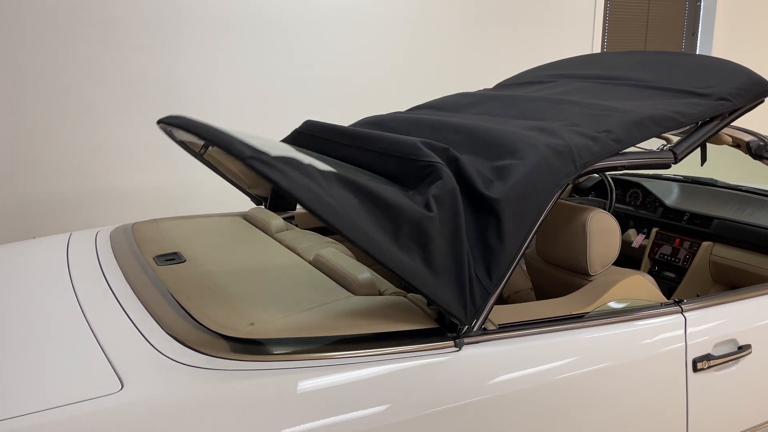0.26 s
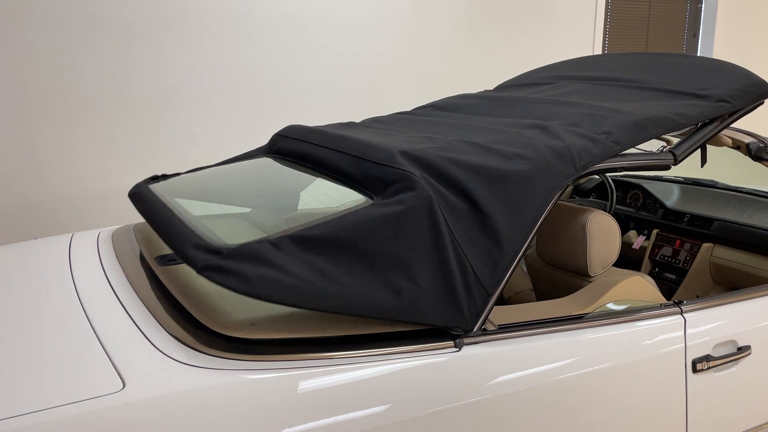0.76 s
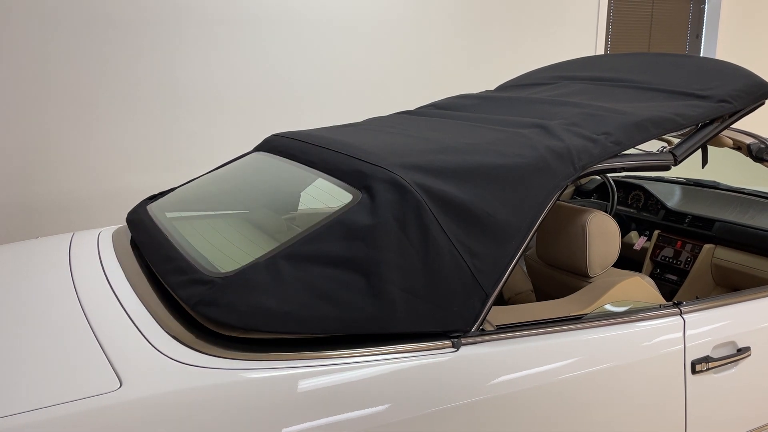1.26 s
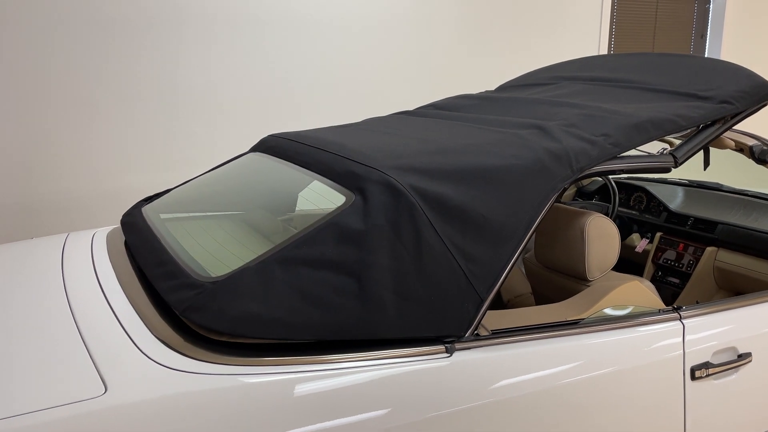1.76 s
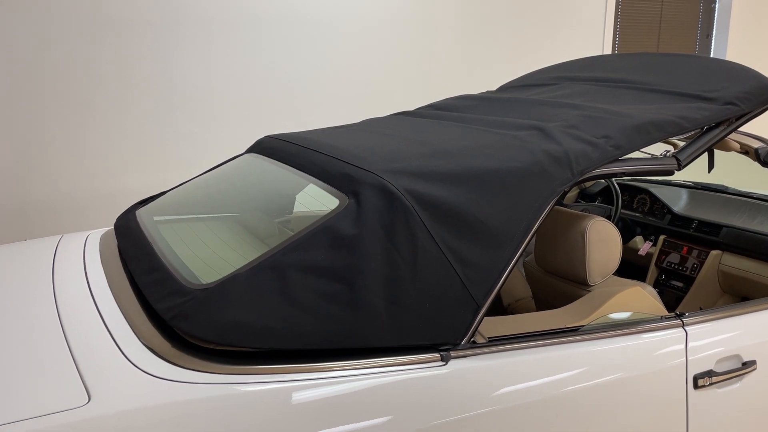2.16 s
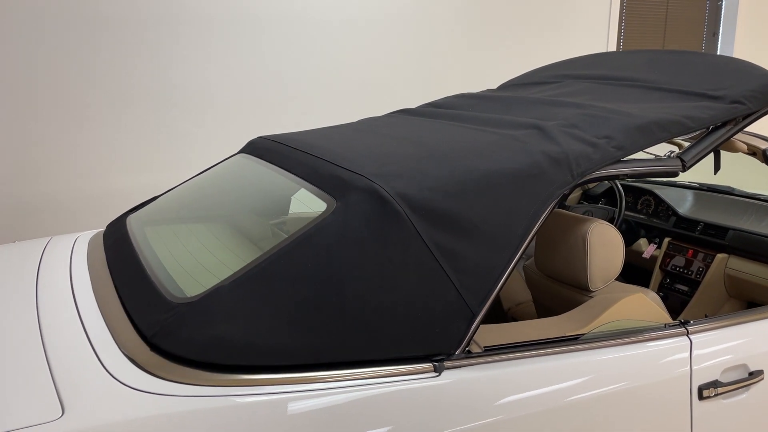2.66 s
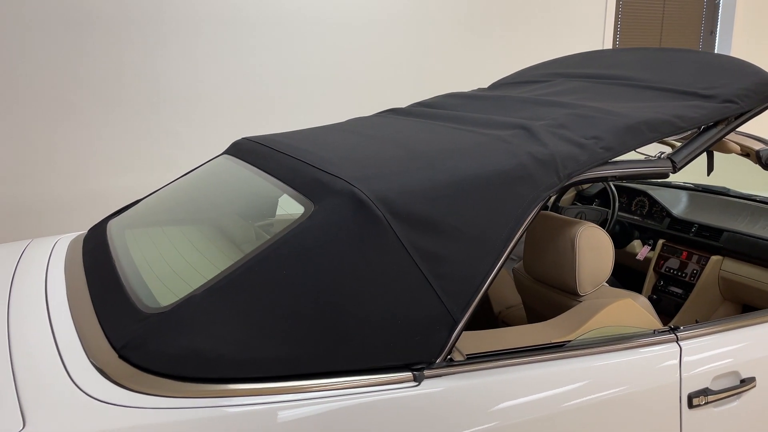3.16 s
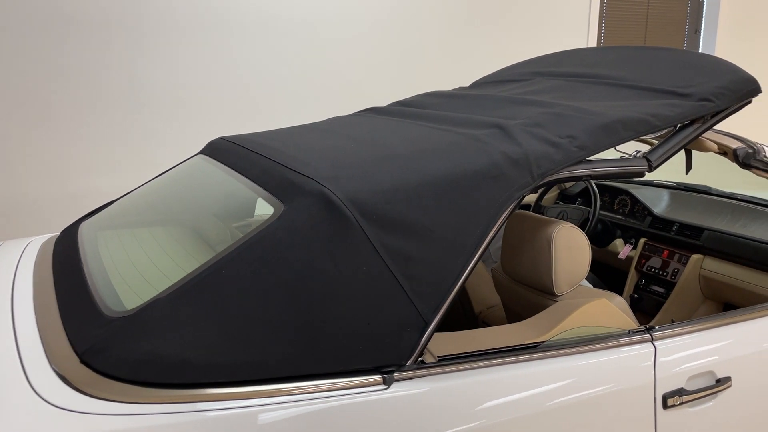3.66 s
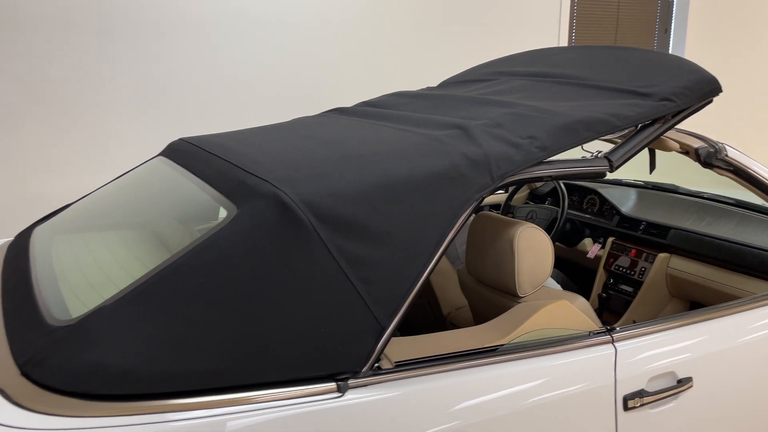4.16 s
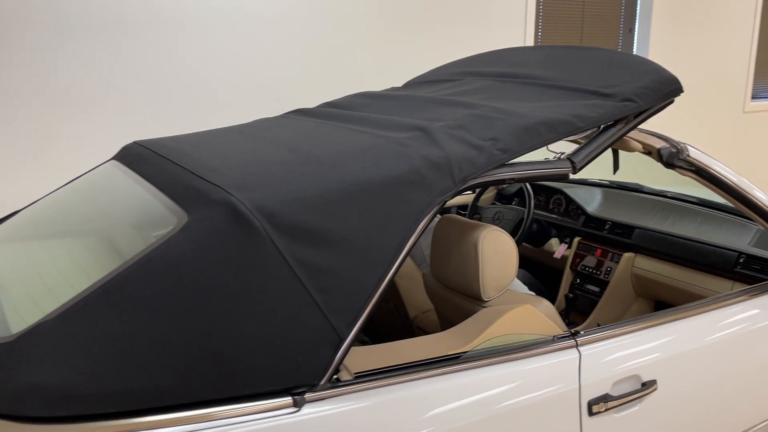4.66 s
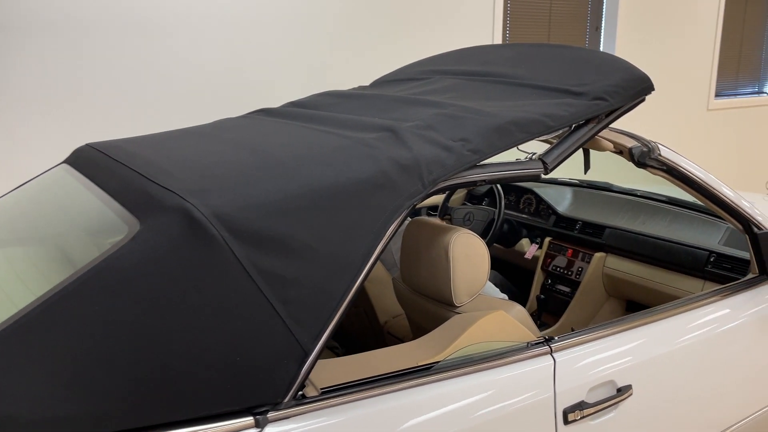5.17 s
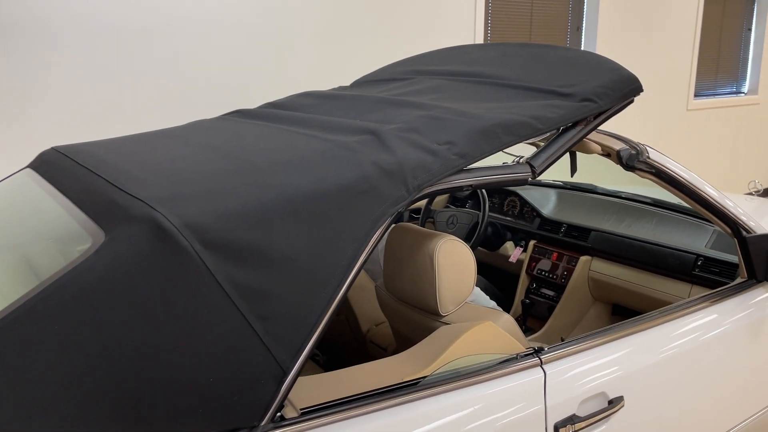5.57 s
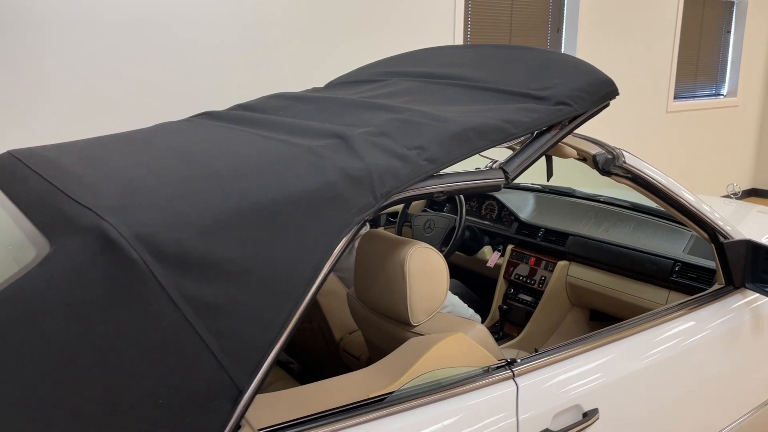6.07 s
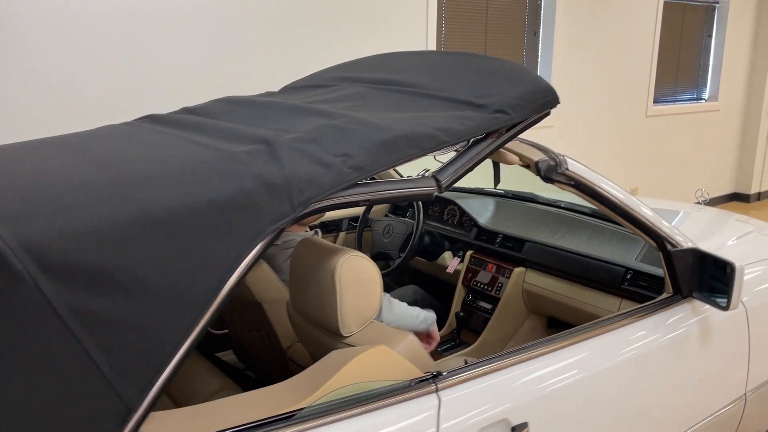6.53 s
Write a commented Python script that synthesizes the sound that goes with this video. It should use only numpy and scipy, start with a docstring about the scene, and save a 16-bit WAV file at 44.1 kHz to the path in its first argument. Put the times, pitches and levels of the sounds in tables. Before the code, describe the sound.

Steady low engine drone, airy fan rush and mid-pitched pump whine, broken by a loud metallic roof clunk and a few smaller knocks.

```python
"""A six-cylinder idle drones in a large showroom, surging once; an electric pump whines over it.
The hydraulic roof of the convertible then latches with a hard clunk and smaller knocks.
Engine, pump, hum and bay drone are wavering sines; knocks are decaying modes plus noise cracks,
with a hall tail. Fan and intake rush is shaped noise with valve ticking, cavity tones and hisses.
"""
import sys
import numpy as np
from scipy import signal
from scipy.fft import rfft, irfft, next_fast_len
from scipy.io import wavfile
from scipy.ndimage import uniform_filter1d

SR = 44100
rng = np.random.default_rng(int(sys.argv[2]) if len(sys.argv) > 2 else 0)


def output_pcm(signal):
    """Save a mono or channel-first signal as 16-bit PCM at the path in sys.argv[1].

    Samples are clipped to [-1, 1] before scaling.
    """
    pcm = np.clip(np.atleast_2d(signal).T, -1, 1) * 32767
    wavfile.write(sys.argv[1], SR, np.round(pcm).astype(np.int16))


N = 299866


def undb(db):
    """Decibels to gain."""
    return np.exp(np.asarray(db) * (np.log(10) / 20))


def curves(table):
    """Columns of a time table, interpolated at every sample."""
    s, *columns = np.transpose(table)
    return [np.interp(np.arange(N) / SR, s, column) for column in columns]


def over_hz(table, size):
    """A (Hz, dB) table, interpolated over log frequency at every transform bin."""
    hz, db = np.transpose(table)
    bin_hz = np.fft.rfftfreq(size, 1 / SR)
    return np.interp(np.log(bin_hz + 1), np.log(hz), db)


def walk(rate_hz):
    """Random levels held 1 / rate_hz s and slewed twice; spread near 1."""
    held = np.repeat(rng.standard_normal(int(N / SR * rate_hz) + 3), 8)
    slewed = uniform_filter1d(uniform_filter1d(held, size=8), size=8)
    return 1.3 * np.interp(np.arange(N) * rate_hz * 8 / SR, np.arange(len(held)), slewed)


def bump(s, half_s):
    """A smooth swell of height 1 around a moment, down to 1/e at half_s."""
    return np.exp(-((np.arange(N) / SR - s) / half_s) ** 2)


def tone(hz, db):
    """A sine with moving pitch and rms level, from a random phase."""
    cycles = np.cumsum(hz) / SR + rng.random()
    return np.sqrt(2) * undb(db) * np.sin(2 * np.pi * cycles)


def narrow(hz, width_hz):
    """Noise of rms 1 ringing in one resonance."""
    x = signal.lfilter(*signal.iirpeak(hz, hz / width_hz, fs=SR), rng.standard_normal(N))
    return x / x.std()


# Engine idle, surging once as the load drops.
# Each row: time in seconds, firing rate in Hz, firing tone in dB, its fourth multiple in dB.
IDLE = [(0, 39.33, -29.5, -45), (0.35, 38.84, -28, -39), (0.7, 39.3, -28.5, -51), (0.95, 42, -30, -49.5),
        (1.2, 41.43, -36, -50.5), (1.4, 40.6, -31, -49), (2.1, 38.11, -33.5, -45), (3.8, 37.99, -33.5, -60),
        (5.0, 38.55, -33.5, -48), (6.4, 38.09, -36, -60), (6.8, 39.13, -31, -64)]
# Weaker engine and belt-driven tones. Each row: multiple of the firing rate, level in dB.
ENGINE_TONES = [(1.33, -77), (2, -55.5), (2.22, -50.5), (2.82, -50.5), (3, -61), (3.43, -58.5), (3.75, -49),
                (4.47, -55.5), (5, -65), (6, -54.5), (6.35, -52.5), (8.75, -57), (9, -54), (10.5, -68),
                (12, -52)]
# Alternator slot tones. Each row: multiple of the firing rate, level in dB re the whine.
SLOTS = [(34.4, 0), (35.3, 3), (36.2, -3), (37.3, -4)]
WHINE_IDLE_DB = -59.5
SURGE_S, SURGE_RISE_DB, SURGE_HALF_S = 0.97, 7, 0.2


def engine():
    """Sines locked to the firing rate, wavering as combustion varies; the alternator sings above."""
    firing_hz, first_db, fourth_db = curves(IDLE)
    out = tone(firing_hz, first_db + 1.6 * walk(7.6))
    out += tone(4 * firing_hz, fourth_db + 1.3 * walk(4.16))
    for multiple, db in ENGINE_TONES:
        hz = multiple * firing_hz * (1 + 0.00291 * walk(5))
        out += tone(hz, db + 1.7 * walk(4.01))
    whine_db = WHINE_IDLE_DB + SURGE_RISE_DB * bump(SURGE_S, SURGE_HALF_S)
    for multiple, db in SLOTS:
        hz = multiple * firing_hz * (1 + 0.00401 * walk(20))
        out += tone(hz, whine_db + db + 2.0 * walk(15))
    return out


def ring(modes, centre_hz, spread_octaves, push_s, rattle_s, scatter_cycles):
    """Decaying modes, strongest near centre_hz, set off by a contact of push_s; peak near 1."""
    hz, db, t60_s = np.transpose(modes)[:, :, None]
    t = np.arange(SR // 3) / SR
    db = db - 6 * (np.log2(hz / centre_hz) / spread_octaves) ** 2
    # clamped differently at each blow
    hz = hz * (1 + 0.0059 * rng.standard_normal(hz.shape))
    # loose parts shake each mode, in steps of 30 samples
    rattle = rng.standard_normal((len(hz), len(t) // 30))
    rattle = uniform_filter1d(rattle, int(rattle_s * SR / 30), axis=1)
    db = db + 1.8 * np.repeat(rattle / rattle.std(), 30, axis=1) - 60 * t / t60_s
    cycles = hz * t + scatter_cycles * rng.random(hz.shape)
    y = np.sum(undb(db) * np.sin(2 * np.pi * cycles), axis=0)
    y *= 1 - np.exp(-t / push_s)
    return y / y[:SR // 40].std() / 3


# Noise colour of a crack. Each row: frequency in Hz, relative level in dB.
CRACK = [(300, -14), (700, -14), (1500, 0.5), (2500, -2), (3300, 0), (4000, -2.5), (5000, -3.5),
         (7000, -9.5), (10000, -8), (13000, -15), (15500, -23)]
# Crack decay: t60 in seconds of the body, then of the top.
CRACK_T60_S = 0.13, 0.086


def crack_noise():
    """Burst of coloured noise; the top dies sooner than the body."""
    t = np.arange(SR // 3) / SR
    top = np.clip(np.fft.rfftfreq(len(t), 1 / SR) / 9000, 0, 1)
    noise = rfft(rng.standard_normal(len(t))) * undb(over_hz(CRACK, len(t)))
    crack = np.zeros(len(t))
    for part, t60_s in zip((1 - top, top), CRACK_T60_S):
        crack += irfft(noise * part, len(t)) * np.exp(-np.log(1000) * t / t60_s)
    onset = 1 - np.exp(-t / 0.00055)
    return crack * onset / crack[:SR // 50].std() / 4


HALL_T60_S, HALL_DB, HALL_LOWPASS_HZ = 1.3, -22, 2620


def hall_tail(knocks):
    """Hall answer: convolution with dulled, decaying noise of unit energy."""
    t = np.arange(SR) / SR
    hall = rng.standard_normal(SR) * np.exp(-np.log(1000) * t / HALL_T60_S)
    hall *= 1 - np.exp(-t / 0.013)
    hall = signal.lfilter(*signal.butter(1, HALL_LOWPASS_HZ, fs=SR), hall)
    hall /= np.sqrt(np.sum(hall ** 2))
    return undb(HALL_DB) * signal.fftconvolve(knocks, hall)[:len(knocks)]


# Knocks of the roof frame. Each row: start in seconds, thump in dB, thump centre in Hz,
# ring in dB, ring centre in Hz, ring spread in octaves, crack in dB.
KNOCKS = [(1.314, -21.5, 84, -32, 700, .4, -49), (2.485, -27, 145, -42, 1502, .4, -35),
          (2.685, -27, 199, -11, 1950, 0.16, -11.5), (2.6858, -40, 199, -14, 1350, 0.22, -30),
          (2.687, -12.5, 201, -12, 644, 0.42, -15.5), (2.694, -40, 230, -22.5, 2410, 0.13, -21),
          (2.692, -19.5, 230, -10, 875, 0.21, -24), (2.699, -22.5, 250, -17, 1790, .1, -24),
          (2.704, -31, 250, -10, 840, 0.16, -38), (2.7104, -11, 190, -18, 1150, 0.44, -38),
          (2.719, -27, 200, -16, 760, .35, -40), (2.727, -27, 200, -24.5, 560, 0.45, -42),
          (2.734, -13.5, 120, -27, 1100, .4, -44), (2.741, -40, 120, -24, 990, .12, -42),
          (2.757, -35, 130, -35, 700, .4, -40), (2.775, -32, 150, -37, 1850, .3, -40),
          (2.79, -21.5, 155, -30, 875, .3, -41), (2.808, -28, 202.3, -28, 790, 0.28, -36),
          (2.835, -36, 170, -33, 1100, .5, -41), (2.869, -26, 169.6, -36, 1686, .4, -44),
          (2.9804, -28, 170, -30, 2015, .04, -21), (2.9853, -40, 173, -23, 960, 0.081, -36),
          (2.995, -34, 200, -33, 1400, .4, -33), (3.008, -36, 200, -33, 800, .5, -39),
          (4.016, -28.5, 249.8, -30, 453, 0.36, -40), (4.059, -26, 152, -29, 400, 0.45, -46)]
# Modes of the lid. Each row: nominal frequency in Hz, relative level in dB, t60 in seconds.
LID = [(91.6, -1, 0.24), (120, 8.5, 0.17), (168.6, 5.5, 0.1), (186, 2, 0.12), (218, 4.5, 0.1),
       (252, -2, 0.074), (280, -4, 0.62)]
# Modes of the frame. Each row: nominal frequency in Hz, relative level in dB, t60 in seconds.
FRAME = [(360, 0, 0.09), (461, 2.5, 0.1), (520, -5, 0.08), (582.8, 0.5, 0.099), (645, 2, 0.08),
         (705, 1, 0.09), (772, 2, 0.068), (826, -1, 0.09), (894, 3, 0.06), (940, 0.5, 0.063),
         (1032, -1.5, 0.14), (1120, 0, 0.073), (1208, -4, 0.076), (1344, -5, 0.081), (1441, -5, 0.07),
         (1540, -1, 0.07), (1684, 0.5, 0.072), (1766, -3, 0.06), (1805, 0, 0.053), (1884, -2, 0.057),
         (1940, -5.5, 0.04), (2006, -3, 0.05), (2210, -1, 0.053), (2420, -10, 0.08), (2480, -9, 0.06)]


def roof():
    """Each knock thumps the lid, rings the frame and cracks; the hall answers softly."""
    out = np.zeros(N + SR)
    for s, thump_db, thump_hz, ring_db, ring_hz, spread, crack_db in KNOCKS:
        knock = undb(crack_db) * crack_noise()
        knock += undb(thump_db) * ring(LID, thump_hz, spread_octaves=0.45, push_s=0.0015,
                                       rattle_s=0.021, scatter_cycles=0.18)
        knock += undb(ring_db) * ring(FRAME, ring_hz, spread_octaves=spread, push_s=0.00065,
                                      rattle_s=0.012, scatter_cycles=0.52)
        k = int(s * SR)
        out[k:k + len(knock)] += knock
    return (out + hall_tail(out))[:N]


# Electric pump whine, fading after the latch and returning lower.
# Each row: time in seconds, pitch in Hz, level in dB.
PUMP = [(0, 774.5, -42.5), (1.2, 775, -44), (1.6, 773, -41.5), (2.7, 777, -42), (3.2, 772.7, -48),
        (3.6, 776.4, -77), (4.5, 770, -51), (5.5, 769, -48), (6.45, 768, -46.5), (6.6, 761, -55),
        (6.8, 761.7, -58)]


def pump():
    """Pump whine: one sine with unsteady pitch and level."""
    hz, db = curves(PUMP)
    return tone(hz * (1 + 0.00307 * walk(24.86)), db + 2.0 * walk(20))


# Brief dips of the hum. Each row: time in seconds, level change in dB.
HUM_DIPS = [(.45, -1), (1.65, -9), (2.0, -3.5), (2.87, -2), (3.6, -5), (4.22, -11), (5.25, -7), (5.5, -4.5),
            (6.36, -13), (6.8, -6)]
HUM_HZ, HUM_DB, HUM_DIP_HALF_S = 58.1, -37.5, 0.11


def hum():
    """Low wavering sine, independent of the engine, that dips briefly."""
    db = HUM_DB + sum(dip_db * bump(s, HUM_DIP_HALF_S) for s, dip_db in HUM_DIPS)
    return tone(HUM_HZ * (1 + 0.00804 * walk(4.14)), db + 1.05 * walk(4.38))


# Drone from the engine bay. Each row: time in seconds, pitch in Hz, level in dB.
DRONE = [(0, 707, -51), (1.2, 700, -63), (1.6, 710, -44), (1.9, 695, -63), (2.15, 688, -52),
         (2.5, 681.7, -44.5), (3.0, 682.4, -45), (4.1, 680.7, -46), (4.3, 684, -54), (4.75, 694.3, -42.5),
         (5.05, 693.8, -52.5), (5.4, 688.8, -44), (5.95, 687.5, -47), (6.1, 686.7, -54), (6.25, 689, -47.5),
         (6.8, 683.4, -49)]


def bay_drone():
    """Engine-bay drone: one sine wavering in pitch and level."""
    hz, db = curves(DRONE)
    return tone(hz * (1 + 0.00616 * walk(14)), db + 3.04 * walk(24))


def valve_ticks(turns):
    """Decaying pulse at every second firing."""
    return np.exp(-(turns / 2 % 1) / 0.14)


# Rush gains over time. Each row: time in seconds, low in dB, middle in dB, high in dB.
RUSH = [(0, 5, -0.5, -1), (1, 3.5, -0.8, 0), (2.3, 3, -3, -2), (3, 4, 0, 0.5), (3.6, 2.5, -1, -1.5),
        (5.2, 2.5, -0.5, -1.5), (6.8, 3.5, 0.5, -0.5)]
# Air noise before the rush gains. Each row: frequency in Hz, density in dB per Hz.
AIR = [(28, -79), (50, -64.5), (150, -69), (330, -70), (400, -75.5), (500, -70), (850, -75), (1400, -73),
       (2000, -78.5), (2800, -81.5), (3500, -90), (5000, -86.5), (8000, -92), (11000, -99), (13500, -105),
       (15300, -105)]
RIPPLE_DB, RIPPLE_WIDTH_HZ = 2, 37


def rush(turns):
    """Fan and intake noise in half octaves; valve gear and a belt-driven shaft throb the treble."""
    low_db, middle_db, high_db = curves(RUSH)
    size = next_fast_len(N)
    bin_hz = np.fft.rfftfreq(size, 1 / SR)
    noise = rfft(rng.standard_normal(size)) * undb(over_hz(AIR, size)) * np.sqrt(SR / 2)
    # a fine random ripple makes the treble grainy
    ripple = uniform_filter1d(rng.standard_normal(len(noise)), int(RIPPLE_WIDTH_HZ * size / SR))
    noise *= undb(RIPPLE_DB * ripple / ripple.std() * np.clip(bin_hz / 2000, 0, 1))
    octave = np.log2(bin_hz / 30 + 1e-9)  # above 30 Hz
    valves = valve_ticks(turns)
    belt = np.exp(-(turns * 0.61 % 1) / 0.058)
    out, swell = np.zeros(N), walk(1.84)
    for centre in np.arange(0, 9.6, 0.5):
        window = np.cos(np.pi / 2 * np.clip(2 * (octave - centre), -1, 1)) ** 2
        band = irfft(noise * window, size)[:N]
        low = np.clip((5.2 - centre) / 0.5, 0, 1)
        high = np.clip((centre - 5.8) / 1.4, 0, 1)
        moving_db = low * low_db + high * high_db + (1 - low - high) * middle_db
        throb_db = 4.5 * valves * np.clip(centre - 6.2, 0, 1)
        throb_db += 1.8 * belt * np.clip(centre - 7.4, 0, 1)
        out += band * undb(moving_db + throb_db + 1.5 * swell + 1.17 * walk(10))
    return out


# Body cavities that the rush excites. Each row: frequency in Hz, width in Hz, level in dB.
CAVITIES = [(337.3, 10.3, -52), (455, 43, -49.5), (1380, 29, -78), (2767, 100, -59), (3160, 160, -61),
            (3360, 260, -61)]


def cavities():
    """Body cavities: resonant noise with slowly wandering level."""
    out = np.zeros(N)
    for hz, width_hz, db in CAVITIES:
        out += narrow(hz, width_hz) * undb(db + 1.8 * walk(1.59))
    return out


# Hisses that come and go.
# Each row: frequency in Hz, width in Hz, level in dB, start in seconds, stop in seconds.
HISSES = [(628, 6, -43, .7, 1.3), (618, 8, -47, -.3, .35), (800, 10, -51, .2, 1.6),
          (470, 30, -49, -.3, 1.2), (505, 30, -51, .1, 1.4), (622, 8, -46, 1.4, 2.1),
          (655, 10, -50, 2.3, 3.4), (651, 10, -45, 3.2, 4.15), (662, 14, -47, 5.0, 5.7),
          (530, 14, -53, .6, 1.8), (1465, 12, -54.5, 5.3, 7.3), (1390, 14, -58, 4.4, 5.4),
          (435, 12, -51, .6, 1.9), (438, 10, -52, 2.5, 3.6), (5025, 14, -63, -.5, 2.75),
          (5540, 14, -68, -.5, 1.4), (5130, 14, -72, .2, 2.6), (5290, 14, -72, .6, 2.4),
          (4870, 14, -72, 1.4, 2.7), (1490, 160, -51, .6, 1.4), (2750, 400, -56, .5, 1.8),
          (1040, 250, -51, 4.8, 7.3), (2800, 14, -64, 4.5, 7.3), (5240, 70, -69, 3.7, 5.0),
          (5190, 14, -61, 6.5, 7.3), (5000, 300, -59, 6.45, 7.3), (7150, 50, -68, 3.5, 7.3),
          (9950, 120, -66, 4.4, 7.3)]


def hisses(turns):
    """Wavering whistles and resonant noise with 0.25 s fades; those above 4 kHz tick with the valves."""
    out, t, valves = np.zeros(N), np.arange(N) / SR, valve_ticks(turns)
    for hz, width_hz, db, start_s, stop_s in HISSES:
        treble = hz > 4000
        if width_hz < 15:
            whistle_hz = hz + width_hz / 2 * walk(20) + hz * 0.003 * walk(60) * treble
            hiss = tone(whistle_hz, 2.2 * walk(18))
        else:
            hiss = narrow(hz, width_hz)
        fade = np.clip(np.minimum(t - start_s, stop_s - t) * 4, 0, 1)
        out += hiss * undb(db + 1.4 * walk(9) + 5.0 * valves * treble) * fade
    return out


# Stereo width by frequency, set before the lean. Each row: frequency in Hz, side minus mid in dB.
WIDTH = [(60, -23), (250, -11.5), (700, -4), (1400, -1), (2800, -4), (4500, -6.5), (7000, -3.5), (7600, 8),
         (8200, 49), (8900, 5), (10200, -5.5), (10900, -10), (12300, -30), (13400, 7), (14200, 27)]
# Lean of the shared sound. Each row: frequency in Hz, left minus right in dB.
LEAN = [(60, -1.5), (110, -0.5), (200, -3.5), (380, -2.5), (700, -0.5), (1290, -6), (2380, 0), (4400, 5),
        (8120, -2), (15000, 1)]


def stereo(sound, treble_share, lead):
    """Left and right from mid and side; side is the sound through all-passes or led a quarter cycle."""
    size = next_fast_len(N + SR // 4)
    direct = rfft(sound, size)
    scattered = direct.copy()
    for lag_samples in (113, 331, 557, 797):
        delay = np.exp(-2j * np.pi * np.fft.rfftfreq(size) * lag_samples)
        scattered *= (delay - 0.55) / (1 - 0.55 * delay)
    scattered = lead * 1j * direct + np.sqrt(1 - lead ** 2) * scattered
    # treble_share scales the width in dB above 7 kHz
    share = np.where(np.fft.rfftfreq(size, 1 / SR) > 7000, treble_share, 1)
    ratio = undb(share * over_hz(WIDTH, size))
    mid = direct / np.sqrt(1 + ratio ** 2)
    side = scattered * ratio / np.sqrt(1 + ratio ** 2)
    # the car stands to one side, which tilts what both channels share
    side += np.tanh(over_hz(LEAN, size) * np.log(10) / 40) * mid
    return irfft(np.array([mid + side, mid - side]), size)[:, :N]


def scene():
    """The running car spread by all-passes; the close roof knocks spread by a phase lead."""
    turns = np.cumsum(curves(IDLE)[0]) / SR  # firings so far
    car = engine() + pump() + hum() + bay_drone()
    car += rush(turns) + cavities() + hisses(turns)
    return stereo(car, treble_share=1, lead=0) + stereo(roof(), treble_share=0.61, lead=1)


def record(dry):
    """Steep elliptic lowpass at 15.7 kHz cuts the top."""
    return signal.sosfilt(signal.ellip(10, 0.2, 80, 15700, fs=SR, output="sos"), dry)


dry = scene()
out = record(dry)
output_pcm(out)
```